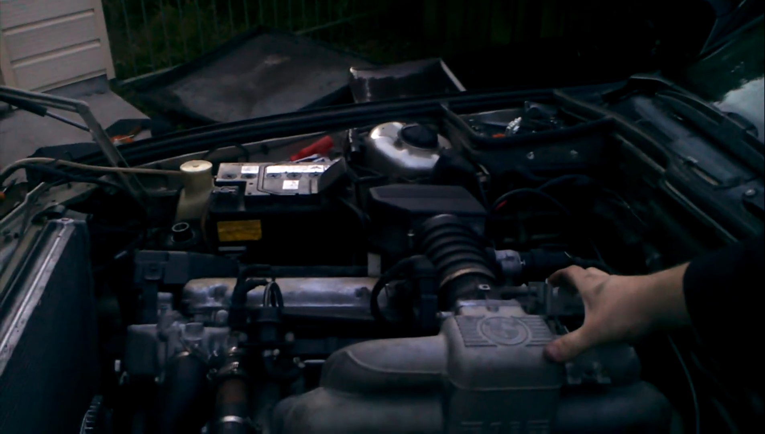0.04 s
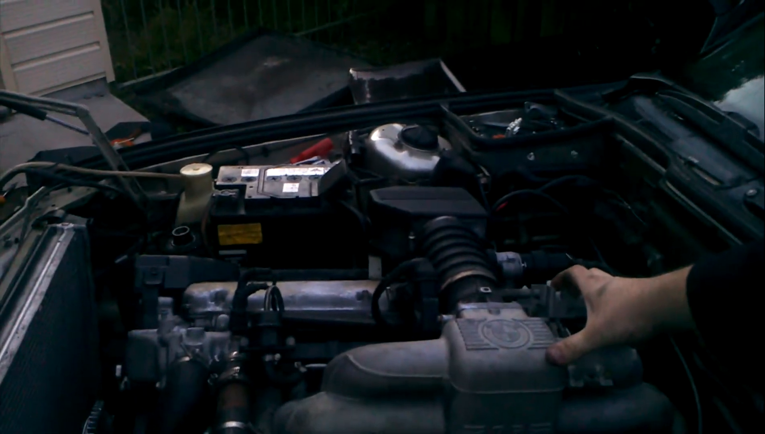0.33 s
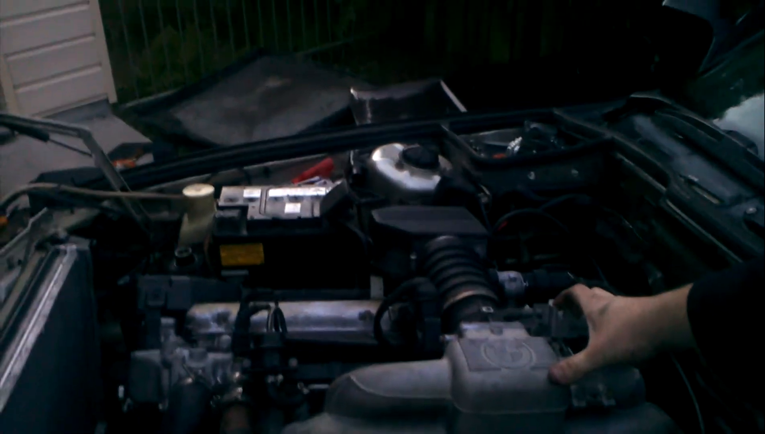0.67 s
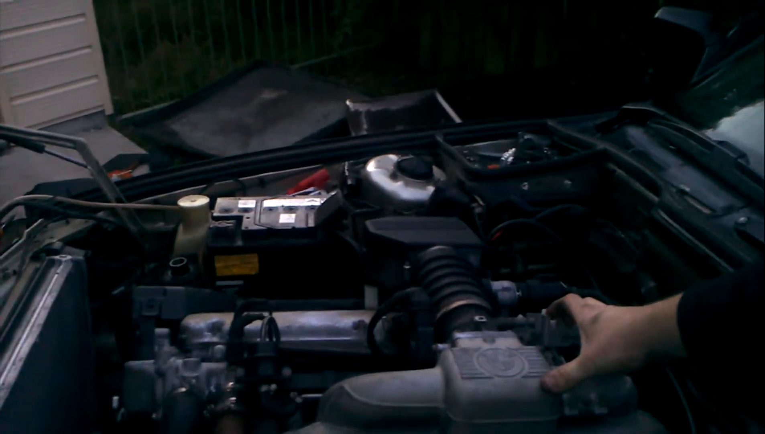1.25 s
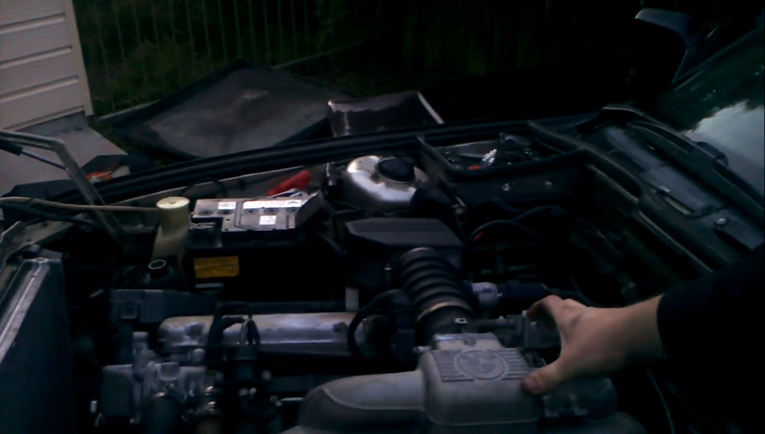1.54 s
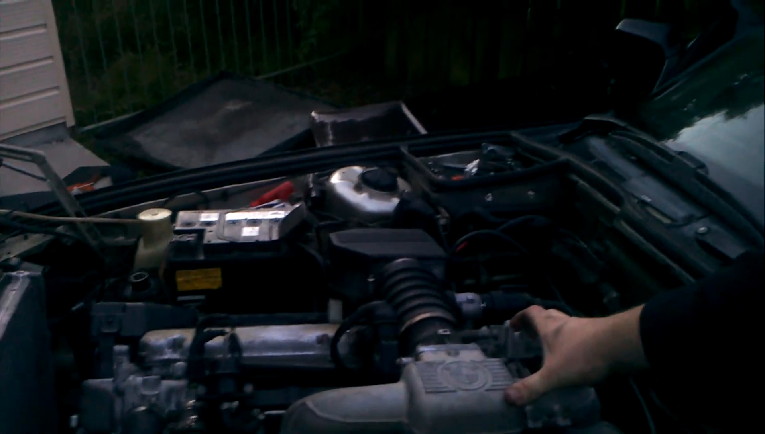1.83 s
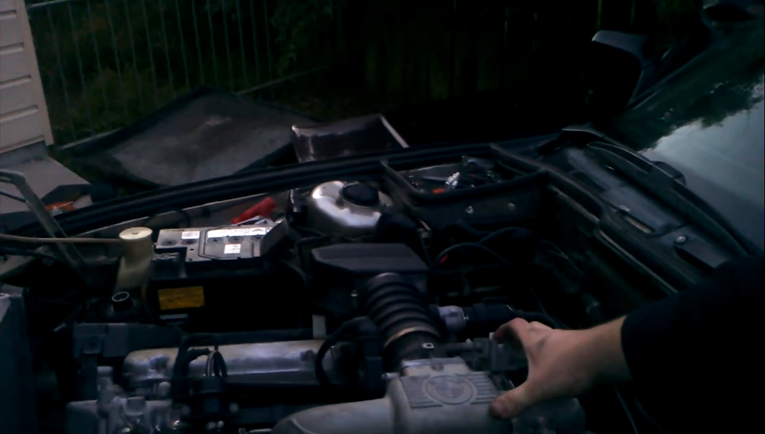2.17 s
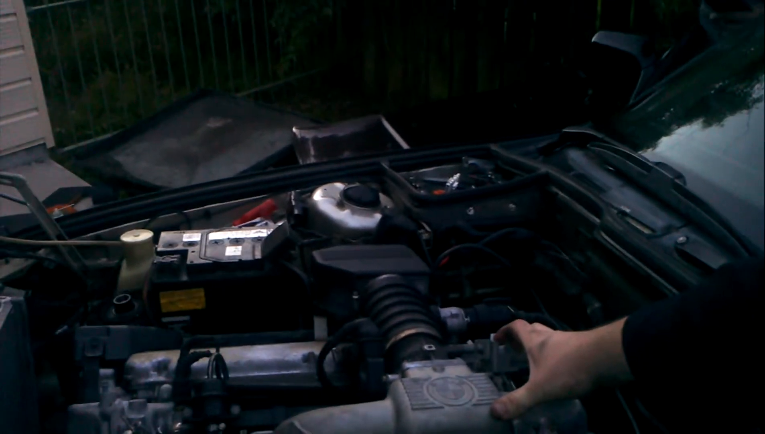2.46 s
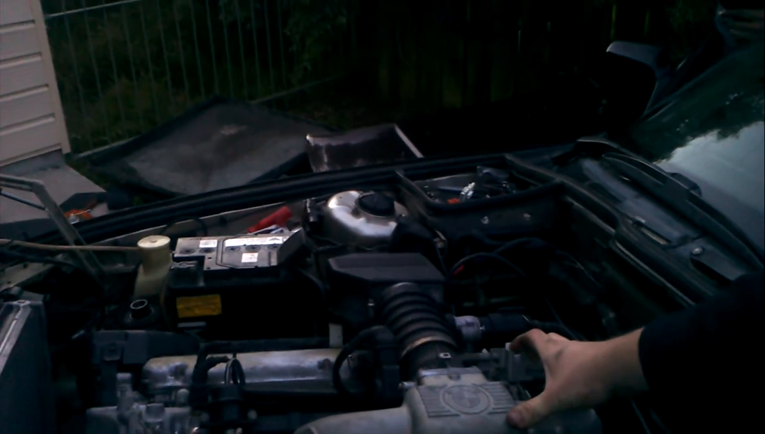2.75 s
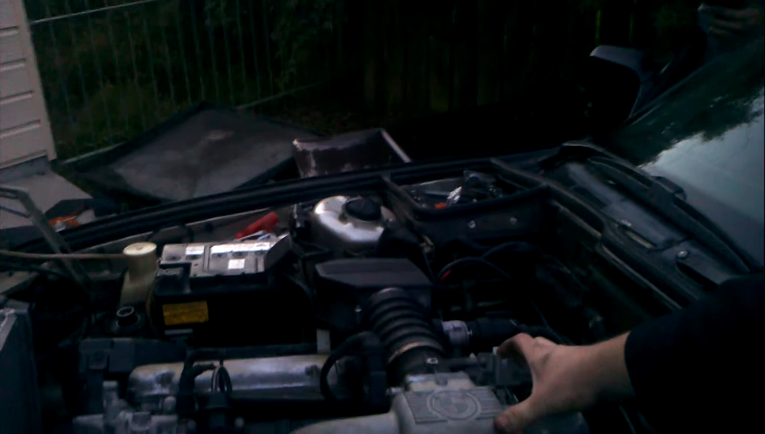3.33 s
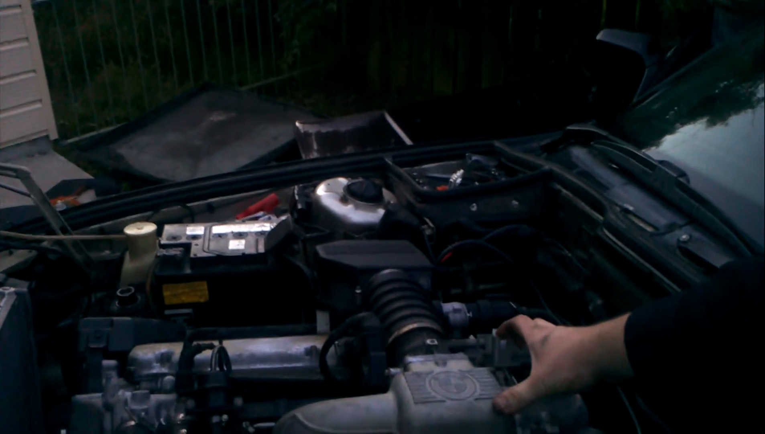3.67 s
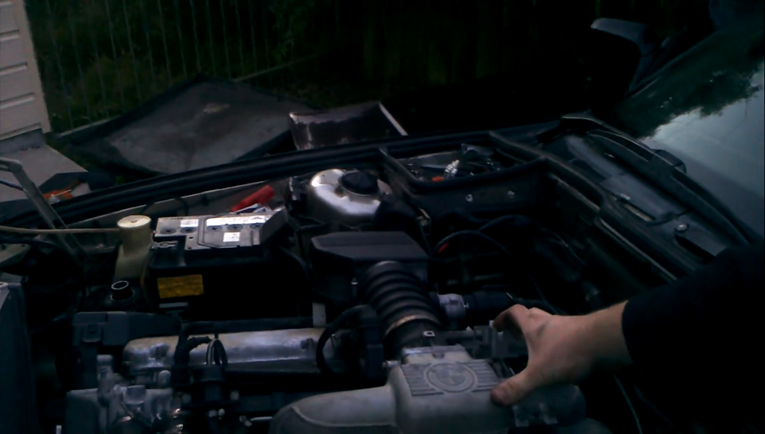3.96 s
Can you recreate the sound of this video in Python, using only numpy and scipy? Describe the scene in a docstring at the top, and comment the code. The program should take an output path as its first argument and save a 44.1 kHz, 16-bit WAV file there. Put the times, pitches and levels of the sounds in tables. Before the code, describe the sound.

A car engine cranks, catches and revs loudly, close over the open hood.

```python
"""A four-cylinder car engine starts, heard right over the open bay in a quiet yard.
First two sharp ticks sound and a small bird chirps. The solenoid clacks, the starter's gear teeth
grind in surges and ring the housing, and lone firings cough early. The engine catches and revs,
booming in the exhaust pipes and overloading the microphone into near-square waves."""
import sys
import numpy as np
from scipy import signal
from scipy.fft import rfft, irfft
from scipy.io import wavfile

SR = 44100
rng = np.random.default_rng(int(sys.argv[2]) if len(sys.argv) > 2 else 0)


def store_wav(level_fs):
    """Save 16-bit WAV to argv[1]."""
    pcm = np.round(np.clip(np.atleast_2d(level_fs), -1, 1) * 32767)
    wavfile.write(sys.argv[1], SR, pcm.T.astype(np.int16))


N = 176400
T = np.arange(N) / SR

# Ring gear and bell housing modes. Each row: frequency in Hz, width in Hz, level in dB.
HOUSING_MODES = [(280, 220, -4), (490, 50, -4), (835, 30, -1), (953, 35, -3), (1331, 18, 1), (1538, 55, -4),
                 (1704, 22, 8), (1896, 30, 7), (2050, 120, 0), (2267, 60, -3), (3380, 100, -8)]


def from_db(db):
    """Decibels to gain."""
    return 10 ** (np.asarray(db) / 20)


def rms_one(x):
    """Scale to unit rms."""
    return x / np.sqrt(np.mean(x ** 2) + 1e-20)


def white():
    """Unit white noise."""
    return rng.standard_normal(N)


def sine(cycles):
    """Sine of a phase in cycles."""
    return np.sin(2 * np.pi * cycles)


def in_time(rows):
    """Join (s, value) points by straight lines."""
    return np.interp(T, *np.transpose(rows))


def level(rows):
    """Gain along (s, dB) points, silent before the first."""
    return from_db(in_time(rows)) * (T >= rows[0][0])


def colour(x, points):
    """Filter by a (Hz, dB) curve."""
    hz, db = np.transpose(points)
    bins_hz = np.maximum(np.arange(N // 2 + 1) * SR / N, 1)
    return irfft(rfft(x) * from_db(np.interp(np.log(bins_hz), np.log(hz), db)), N)


def noise(points):
    """Unit-rms noise with a (Hz, dB) spectral shape."""
    return rms_one(colour(white(), points))


def drift(rate_hz):
    """Unit-rms random wander below rate_hz."""
    lowpass = signal.butter(2, rate_hz, fs=SR, output="sos")
    return rms_one(signal.sosfilt(lowpass, rng.standard_normal(N + SR))[SR:])


def resonate(x, modes):
    """Parallel resonances (Hz, width Hz, dB) of alternating sign; unit rms."""
    out = 0
    for k, (hz, width_hz, db) in enumerate(modes):
        r = np.exp(-np.pi * width_hz / SR)
        poles = [1, -2 * r * np.cos(2 * np.pi * hz / SR), r * r]
        out = out + (-1) ** k * from_db(db) * (1 - r * r) * signal.lfilter([1, 0, -1], poles, x)
    return rms_one(out)


def swell(start_s, length_s, db):
    """Half-sine envelope peaking at db."""
    return from_db(db) * np.sin(np.pi * np.clip((T - start_s) / length_s, 0, 1))


def bursts(rows):
    """Envelope of sudden, decaying contacts (start s, dB, T60 s)."""
    return sum((T >= s) * from_db(db - 60 * np.maximum(T - s, 0) / t60) for s, db, t60 in rows)


def impacts(cycles, spread_db, noise_decay, noise_gain):
    """One click of random strength and one decaying noise burst per cycle."""
    clicks = np.diff(np.floor(cycles), prepend=0) * from_db(spread_db * white())
    tails = np.exp(-noise_decay * (cycles % 1)) * white()
    return rms_one(clicks) + noise_gain * rms_one(tails)


def yard():
    """Outdoor background, faint far-off drones and a passing thin hiss."""
    # Each row: frequency in Hz, relative density in dB.
    air_spectrum = [(15, -35), (25, -2), (87, -1.5), (126, -13), (264, -5.5), (403, -10.5), (485, -9.5),
                    (703, -13.5), (1920, -15), (2380, -25), (3350, -24.5), (4370, -33), (9920, -32),
                    (11300, -31), (14000, -89)]
    hiss_spectrum = [(3000, -17), (7500, -21.5), (10700, 0), (11800, -4)]
    # Each row: time in seconds, level in dB.
    hiss_levels = [(1.1, -58), (1.3, -36.5), (1.44, -32), (1.7, -41), (1.76, -62)]
    # Each row: start in seconds, length in seconds, level in dB, frequency in Hz.
    far_drones = [(-.2, 0.99, -39, 260), (-.1, 0.85, -43.5, 1097), (1.15, 1.34, -42.5, 445)]
    drones = sum(swell(s, length_s, db) * resonate(white(), [(hz, 35, 0)])
                 for s, length_s, db, hz in far_drones)
    air = from_db(-31.5 + 0.09 * drift(15)) * noise(air_spectrum)
    return air + drones + level(hiss_levels) * noise(hiss_spectrum)


def ticks():
    """Two sharp snaps with a faint metallic ring."""
    # Each row: start in seconds, level in dB, T60 in seconds, relative ring level in dB.
    hits = [(.2165, -15.5, 0.02, -11), (.8881, 3.5, 0.0021, -26)]
    # Each row: frequency in Hz, gain in dB.
    snap_filter = [(4500, -20), (5800, -2), (8000, -1), (10000, 8), (12000, -7)]
    snaps = colour(bursts([row[:3] for row in hits]) * rng.choice([-1, 1], N), snap_filter)
    metal = resonate(white(), [(4500, 700, 0)])
    return snaps + metal * bursts([(s, db + ring_db, t60) for s, db, t60, ring_db in hits])


def bird():
    """Steep upward slurs, each closed by a rougher note, scattered by the yard."""
    # Each row: start in seconds, level in dB, top pitch in Hz, relative closing note level in dB.
    chirps = [(1.172, -47, 6060, -7), (1.430, -49, 6020, 2), (1.680, -45, 6020, 3), (1.915, -50.5, 5850, 0),
              (2.168, -46, 5700, -2), (2.442, -46, 5900, -3)]
    rise_hz, rise_s, yard_t60_s = 1090, 0.032, 0.25
    song = 0
    for s, db, top_hz, end_db in chirps:
        slur_hz = top_hz - rise_hz * np.clip(1 - (T - s) / rise_s, 0, 1) + 40 * drift(320)
        end_hz = 5840 + 90 * drift(300)
        slur = swell(s, 0.044, db) * sine(np.cumsum(slur_hz) / SR)
        end_note = swell(s + rise_s, 0.04, db + end_db) * sine(np.cumsum(end_hz) / SR)
        song = song + slur + end_note
    tail = bursts([(0, 0, yard_t60_s)]) * white()
    return song + from_db(-1) * signal.fftconvolve(song, tail / np.linalg.norm(tail))[:N]


def solenoid():
    """After a tiny squeak, the solenoid touches, then slams home with a hollow ring."""
    # Each row: start in seconds, level in dB, T60 in seconds.
    contacts = [(2.642, -21, .05), (2.652, -11, 0.059)]
    # Each row: frequency in Hz, relative density in dB.
    clack_spectrum = [(200, 3.5), (1500, 0), (5000, -12), (7500, -9), (10500, -2), (12000, -5)]
    # Each row: frequency in Hz, width in Hz, level in dB.
    steel_modes = [(2170, 130, 4.5), (3400, 200, -2), (4800, 52, 1), (5130, 60, 3), (10100, 300, -2)]
    slam_s = contacts[-1][0]
    squeak = swell(2.603, 0.0076, db=-21.5) * sine(1650 * T)
    clack = bursts(contacts) * (noise(clack_spectrum) + from_db(-3.5) * resonate(white(), steel_modes))
    ring = bursts([(slam_s, -19.5, 0.19)]) * sine(397 * T)
    return squeak + clack + ring


def starter():
    """Gear teeth strike and scrape, ringing the housing over a whine at the mesh rate."""
    # Speed sags at each compression. Each row: time in seconds, teeth per second.
    mesh_rates = [(2.75, 209), (2.87, 309), (2.93, 319), (2.98, 383), (3.03, 450), (3.065, 475),
                  (3.105, 357), (3.16, 335), (3.205, 538), (3.25, 465), (3.275, 361), (3.33, 330),
                  (3.37, 257), (3.5, 248)]
    # Each row: time in seconds, level in dB.
    surge_levels = [(2.742, -69), (2.755, -14.5), (2.785, -14), (2.805, -1), (2.87, -2.5), (2.94, 3),
                    (2.995, -7.5), (3.03, 0), (3.10, 5), (3.135, -9), (3.19, -22), (3.21, 13), (3.25, 7.5),
                    (3.28, -8.5), (3.33, -17), (3.345, 11), (3.395, 8), (3.43, -8.5), (3.55, -30)]
    # Each row: frequency in Hz, relative gain in dB.
    rasp_filter = [(100, -3.5), (300, -2), (1000, -1), (2100, -4.5), (2900, -7.5), (5500, -40),
                   (10000, -38)]
    cycles = np.cumsum(in_time(mesh_rates) * (1 + 0.013 * drift(120))) / SR
    teeth = impacts(cycles, spread_db=8.8, noise_decay=2.5, noise_gain=0.96)
    whine = from_db(-6.5) * sine(cycles) + from_db(-7.5) * sine(2 * cycles)
    rasp = from_db(4) * rms_one(colour(teeth, rasp_filter))
    low_ring = from_db(-4.5) * resonate(teeth, HOUSING_MODES[:5])
    surge = level(surge_levels)
    rattle = surge ** 0.76 * resonate(teeth, HOUSING_MODES[5:])  # lingers as the load eases
    squeal = swell(3.205, 0.08, db=5) * sine(1316 * T)  # housing mode in the hardest surge
    return surge * (low_ring + rasp + whine) + rattle + squeal


def clatter():
    """Bright noise of pinion, valves and belts."""
    # Each row: time in seconds, level in dB.
    levels = [(2.742, -46), (2.76, -4.5), (2.785, 5), (2.86, -9), (3.12, -5), (3.38, -2), (3.46, 6),
              (3.6, 7), (3.77, 5.5), (3.85, -7.5), (3.92, 2), (3.96, -6)]
    # Each row: frequency in Hz, relative density in dB.
    spectrum = [(400, -5.5), (1200, -2.5), (2000, 4), (2500, -1), (5000, -1), (7000, -5.5), (10300, 2),
                (11500, 0.5)]
    return level(levels) * noise(spectrum)


def pinion():
    """The pinion crashes into the ring gear, then clinks as the engine overruns it."""
    # Each row: start in seconds, level in dB, T60 in seconds.
    crashes = [(2.75, -27, 0.11), (2.761, 2.5, 0.1)]
    # Each row: start in seconds, level in dB.
    overrun_hits = [(3.515, 13), (3.563, 12), (3.688, 14), (3.712, 9.5), (3.760, 17), (3.874, 11.5),
                    (3.928, 12.5)]
    # Each row: frequency in Hz, width in Hz, level in dB.
    pinion_modes = [(1970, 63, 1.5), (2075, 170, -7.5), (9200, 5400, -25.5)]
    clink_t60_s = 0.033
    crash = bursts(crashes) * resonate(white(), HOUSING_MODES[5:])
    clinks = bursts([(s, db, clink_t60_s) for s, db in overrun_hits]) * resonate(white(), pinion_modes)
    return crash + clinks


def coughs():
    """Single heavy firings: two before the engine catches, one at the top of the rev."""
    # Each row: start in seconds, length in seconds, level in dB, frequency in Hz.
    firings = [(2.984, 0.044, -7.5, 89.5), (3.142, 0.097, -1.5, 79.2), (3.93, 0.088, 19, 108.7)]
    return sum(swell(s, length_s, db) * sine(hz * (T - s)) for s, length_s, db, hz in firings)


def engine():
    """Uneven firings boom in the exhaust; the intake growls as the throttle opens; a rumble swells."""
    # Each row: time in seconds, firings per second.
    firing_rates = [(3.42, 42), (3.52, 44), (3.56, 53), (3.6, 59.5), (3.65, 68), (3.7, 77), (3.76, 85.5),
                    (3.84, 87), (3.9, 95), (4.0, 95)]
    # Each row: time in seconds, level in dB.
    roar_levels = [(3.39, -35), (3.45, -5), (3.5, 1.5), (3.7, 2), (3.87, 11.5), (4.0, 7)]
    growl_levels = [(3.51, -14), (3.55, -1), (3.68, 5.5), (3.78, 8.5), (4.0, 5)]
    rumble_levels = [(3.45, -8), (3.8, 1.5), (3.86, 10.5), (4.0, 12.5)]
    # Each row: multiple of the firing rate, level in dB.
    orders = [(1, -2), (1.5, -4.5), (2, -1.5)]
    # Orders crossing pipe resonances.
    # Each row: start in seconds, length in seconds, level in dB, multiple of the firing rate.
    crossings = [(3.445, .12, 8.5, 3), (3.618, 0.2, 7.5, 1), (3.526, 0.16, 7.5, 5), (3.614, 0.088, 11, 3),
                 (3.72, 0.083, 14, 3.5), (3.732, 0.12, 14, 1.5), (3.741, 0.21, 11, 2)]
    # Each row: frequency in Hz, width in Hz, level in dB.
    exhaust_modes = [(81.5, 35, -5.5), (132.9, 26.6, 0.5), (188.7, 63, 0)]
    intake_modes = [(292.6, 120, 0)]
    # Each row: frequency in Hz, relative density in dB.
    rumble_spectrum = [(15, -28), (45, -14), (70, 5.5), (120, 3), (220, -15), (2000, -70)]
    cycles = np.cumsum(in_time(firing_rates) * (1 + 0.01 * drift(30))) / SR
    hum = sum(from_db(db + drift(16.6)) * sine(k * cycles + rng.random()) for k, db in orders)
    puffs = impacts(cycles, spread_db=3.4, noise_decay=3, noise_gain=0.94)
    roar = level(roar_levels) * (hum + from_db(0.5) * resonate(puffs, exhaust_modes))
    booms = sum(swell(s, length_s, db) * sine(k * cycles + rng.random())
                for s, length_s, db, k in crossings)
    gulps = (1 + np.cos(2 * np.pi * cycles)) * white()
    growl = level(growl_levels) * resonate(gulps, intake_modes)
    return roar + booms + growl + level(rumble_levels) * noise(rumble_spectrum)


def scene():
    """All sources at the microphone, mono."""
    outdoors = yard() + ticks() + bird()
    car = solenoid() + starter() + clatter() + pinion() + coughs() + engine()
    return (outdoors + car)[None]


def record(dry):
    """A band-limited microphone overloads hard; the top is dulled and cut."""
    # Each row: frequency in Hz, gain in dB.
    treble_response = [(10500, -1), (11600, -7.5), (12500, -11), (15500, -10.5)]
    ceiling, knee = 0.69, 2.3
    mic_stop_hz, bleed_above_hz, output_stop_hz = 12800, 3000, 16100
    mic = signal.sosfilt(signal.cheby2(12, 60, mic_stop_hz, fs=SR, output="sos"), dry[0])
    flattened = mic / (1 + np.abs(mic / ceiling) ** knee) ** (1 / knee)
    # Faint treble rides on the flattened waves.
    highpass = signal.butter(2, bleed_above_hz, "high", fs=SR, output="sos")
    bleed = from_db(-35) * signal.sosfilt(highpass, mic)
    dulled = colour(flattened + bleed, treble_response)
    return signal.sosfiltfilt(signal.cheby2(16, 50, output_stop_hz, fs=SR, output="sos"), dulled)[None]


dry = scene()
out = record(dry)
store_wav(out)
```